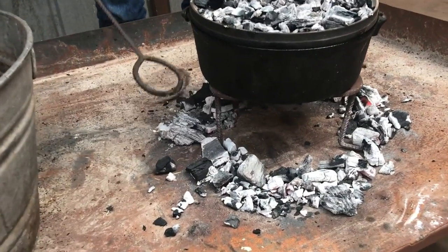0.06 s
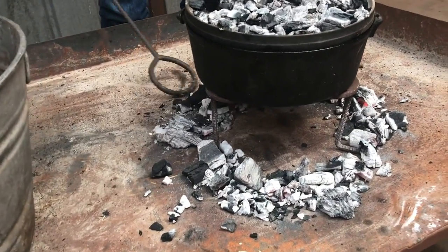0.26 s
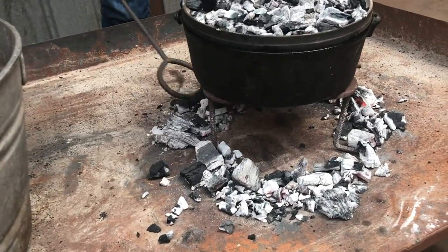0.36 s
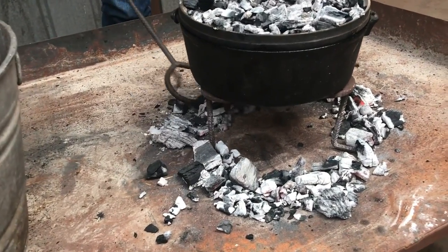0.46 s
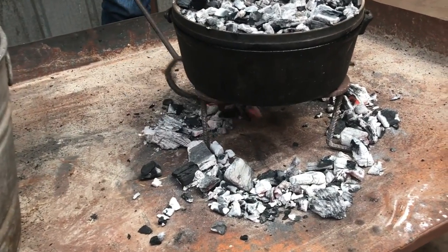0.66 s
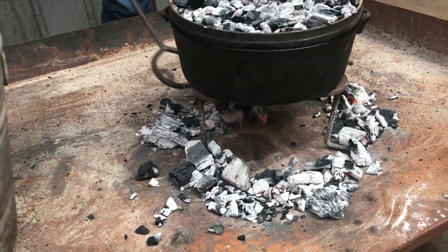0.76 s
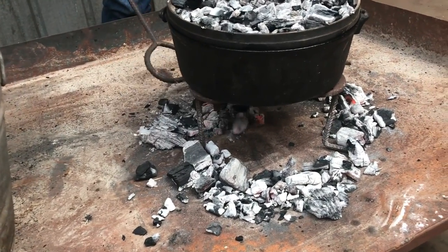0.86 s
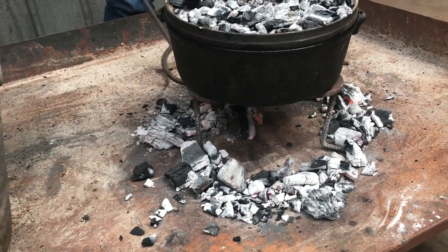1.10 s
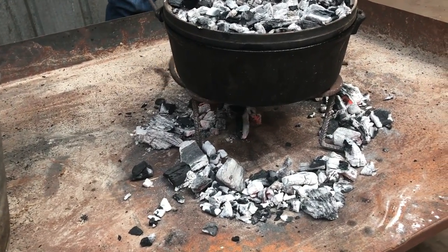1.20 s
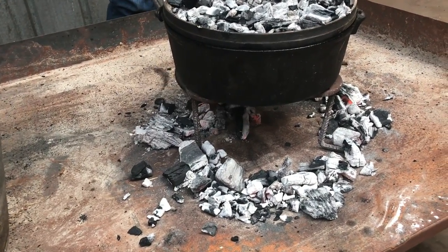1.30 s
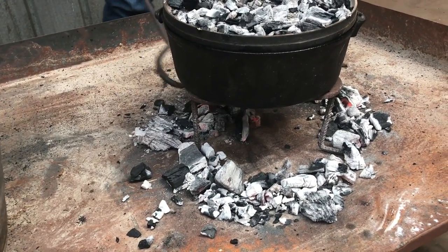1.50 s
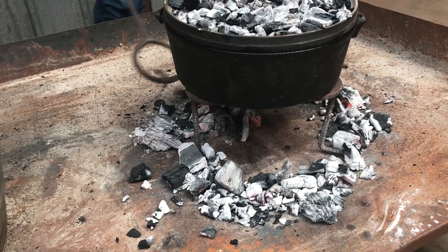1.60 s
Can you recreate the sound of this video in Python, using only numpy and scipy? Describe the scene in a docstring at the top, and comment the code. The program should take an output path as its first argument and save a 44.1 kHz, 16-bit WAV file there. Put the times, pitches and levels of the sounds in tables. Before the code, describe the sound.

Metal poker knocks a steel table, then drags brittle coals in two rough, ringing scrapes

```python
"""In a barn, a metal poker knocks on a sheet-steel table and twice drags hard coals across it.
Knocks and tiny slips make the sheet boom in its modes, and some modes briefly sing.
Dense random grains hiss under the coals, small edges scratch, loose lumps clack and chips tick.
Random echo taps smear the treble, over a quiet hush of filtered noise."""
import sys
import numpy as np
from scipy import signal
from scipy.fft import rfft, irfft, next_fast_len
from scipy.io import wavfile
from scipy.ndimage import uniform_filter1d

SR = 44100
rng = np.random.default_rng(int(sys.argv[2]) if len(sys.argv) > 2 else 0)


def file_out(sig):
    """Save sig as 16-bit WAV at sys.argv[1]."""
    # one column per channel
    cols = np.atleast_2d(sig).T
    # limit, then scale
    lim = np.clip(cols, -1, 1)
    pcm = np.round(lim * 32767).astype(np.int16)
    wavfile.write(sys.argv[1], SR, pcm)


def convert_level_to_amplitude(level_db):
    """Map a level in decibels to its linear amplitude factor."""
    exponent = np.asarray(level_db, float) / 20
    return 10 ** exponent


N = 72765  # length in samples

# Strong modes of the sheet:
# (frequency [Hz], level [dB], time to fall 60 dB [s], half waves along the poker's path)
SHEET_MODES = [(133.86, -1, 0.66, 0.17), (204.9, -2, 0.34, 0.18), (252.6, -2.5, 0.23, 1.66),
               (336.8, -5, 0.095, 0.61), (379, -5.5, 0.21, 0.87), (474, -7, 0.62, 0.68),
               (621, -24.5, 0.093, 5.3), (756, -4.5, 0.46, 1.12), (784.7, -6, 0.26, 2.69),
               (843, -7, 0.11, 1.92), (880, -5.5, 0.3, 0.98), (994, -17.5, 0.63, 0.67),
               (1060, -13, 0.12, 1.2), (1544, -20.5, 0.065, 1.84), (2120, -20, 0.28, 1.53)]
# Coals dragged over the sheet: (time [s], force on the sheet [dB], hardness [dB per octave],
# place on the path [0-1], grit level [dB])
DRAG_PATH = [(0, -50.5, 8.5, 0.4, -49.5), (0.098, -94.5, -29, 0.2, -65.5), (0.198, -63, 0, 0.76, -73.5),
             (0.342, -47, 4, 0, -61), (0.372, -31, -3.5, 0.08, -43), (0.391, -29, 8, 0.28, -36.5),
             (0.429, -33, -3.5, 0.15, -42.5), (0.457, -34, 7.5, 0.73, -40), (0.5, -32.5, 7, 0.6, -41.5),
             (0.562, -38, 1, 0.74, -48.5), (0.662, -50.5, 4.5, 0.56, -61.5), (0.798, -50, -3.5, 0.14, -58),
             (0.947, -49, 3.5, 0.45, -60.5), (1.048, -93, -13.5, 0.6, -72), (1.16, -53, 4, 1, -53.5),
             (1.208, -54.5, 1, 0, -54), (1.236, -53, -14, 0.4, -45.5), (1.255, -32.5, -1.5, 0.19, -44),
             (1.292, -39, -0.5, 0.57, -40.5), (1.35, -43, 2.5, 0, -46), (1.431, -52.5, 4, 0.68, -55),
             (1.521, -50.5, -3.7, 0.21, -67), (1.65, -66, 6.5, 0.2, -61.5)]
# Relative tone colour of the grit: (frequency [Hz], level [dB])
GRIT_COLOUR = [(500, -77), (1500, -9.5), (2500, -11), (3600, -13.5), (4700, -11.5), (6100, -12.5),
               (8600, -5), (11300, -7), (13000, -13.5), (15800, -24.5)]
SLIP_SPREAD_DB = 4.5  # how much stronger the rare big slips are


def evened(x):
    """Scales a sound to an rms of one."""
    return x / np.sqrt(np.mean(x ** 2) + 1e-20)


def read(points, hz):
    """Reads a table between its points, with frequency on a log scale."""
    f, value = np.transpose(points)
    return np.interp(np.log(hz + 1), np.log(f + 1), value)


def coloured(x, gain):
    """Filters the last axis by gain(hz)."""
    size = next_fast_len(x.shape[-1] + 4096)
    spectrum = rfft(x, size) * gain(np.fft.rfftfreq(size, 1 / SR))
    return irfft(spectrum, size)[..., :x.shape[-1]]


def clicks(per_s, spread_db, shape):
    """Makes random clicks of either sign, a few of them large."""
    chance = rng.random(shape)
    strength = rng.exponential(1, shape)
    sign = rng.choice([-1., 1.], shape)
    return evened((chance < per_s / SR) * sign * convert_level_to_amplitude(spread_db * np.minimum(strength, 5)))


def drag_track(column, t):
    """Follows one column of the drag table through time."""
    rows = np.array(DRAG_PATH)
    return np.interp(t, rows[:, 0], rows[:, column])


def lumps():
    """Uneven pressure: contact comes in clumps of about 10 ms."""
    slow = uniform_filter1d(uniform_filter1d(rng.standard_normal(N), 400), 400)
    return convert_level_to_amplitude(3.5 * evened(slow))  # rms swing in dB


def ring(hz, t60, sign):
    """Rings a group of modes after one tap: fading sines, with unit energy in all."""
    t = np.arange(24000) / SR
    sines = sign[:, None] * np.sin(2 * np.pi * hz[:, None] * t)
    h = sines.sum(0) * convert_level_to_amplitude(-60 * t / max(t60, .03))
    return h / np.linalg.norm(h)


def mode_groups(t):
    """Lists each strong mode alone, then the crowd in half-octave groups with wandering weights."""
    # How long the weak modes ring: (frequency [Hz], time to fall 60 dB [s])
    crowd_t60 = [(60, 1), (400, 0.45), (1500, 0.43), (5000, 0.55)]
    groups = []
    for k, (f, db, t60, waves) in enumerate(SHEET_MODES):
        groups.append((np.array([f]), db, t60, waves, [(-1.) ** np.array([k])], [1]))
    hz = np.arange(40, 5000, 7.) + 7 * rng.random(709)
    size = rng.standard_normal((2, 709))
    band = np.round(2 * np.log2(hz))
    wander = 2 * np.pi * 2.3 * t  # 2.3 turns a second
    for b in np.unique(band):
        f = hz[band == b]
        shares = [np.cos(wander + b), np.sin(wander + b)]
        groups.append((f, 0, read(crowd_t60, f.mean()), 0, size[:, band == b], shares))
    return groups


def add_knocks(drive, chatter, k, waves, octave):
    """Adds the poker's blows to one mode group's drive: a first contact, then fading chatter."""
    # Poker blows: (time [s], force [dB], hardness [dB per octave], place on the path [0-1],
    # chatter fade time to 1/e [s])
    knocks = [(0.231, -24.5, 1.77, 0.45, 0.023), (0.86, -38.5, 1.5, 0.47, 0.014),
              (1.0719, -33.5, -1.5, 0.22, 0.063), (1.223, -45, 7, 0.4, 0.046)]
    after = np.arange(8000) / SR
    for s, force_db, tilt_db, spot, chatter_s in knocks:
        at = round(s * SR)
        blow = chatter[at + k:at + k + 8000] * np.exp(-after / max(chatter_s, .002))
        blow[0] = 22.6  # first contact, against chatter of about one
        reach = np.cos(np.pi * waves * spot)  # the mode's shape under the poker
        drive[at:at + 8000] += blow * convert_level_to_amplitude(force_db + tilt_db * octave) * reach


def add_thumps(drive, hz):
    """Adds weight landing on the sheet to the drive of one strong mode, one sample per landing."""
    # Weight landing: (time [s], level at the lowest mode [dB], softness [dB per octave])
    thumps = [(0.2313, 7, -9), (1.0727, 5, -10), (1.144, 1, -9)]
    for s, force_db, tilt_db in thumps:
        drive[round(s * SR)] += convert_level_to_amplitude(force_db + tilt_db * np.log2(hz / SHEET_MODES[0][0]))


def sheet():
    """Blows and slips drive each mode by contact hardness and by its shape at the contact."""
    # Tone colour of the weaker modes between the strong ones: (frequency [Hz], level [dB])
    crowd_colour = [(45, -22), (70, -15.5), (100, -9.5), (160, -3.5), (330, -2), (520, -4.5), (900, -5.5),
                    (1400, -14), (2200, -16), (3200, -32), (5000, -58)]
    slips_per_s = 1800
    t = np.arange(N) / SR
    force, hard, place = (drag_track(column, t[::64]) for column in (1, 2, 3))
    slips, chatter = clicks(slips_per_s, SLIP_SPREAD_DB, (2, N)) * lumps()
    strong, crowd = np.zeros((2, N))
    for k, (f, db, t60, waves, signs, shares) in enumerate(mode_groups(t)):
        is_strong = k < len(SHEET_MODES)
        octave = np.log2(max(f.mean(), 130) / 400)
        push = convert_level_to_amplitude(force + hard * octave) * np.cos(np.pi * waves * place)
        drive = np.roll(slips, 37 * k) * np.repeat(push, 64)[:N]  # each group gets shifted slips
        add_knocks(drive, chatter, k, waves, octave)
        if is_strong:
            add_thumps(drive, f[0])
        part = strong if is_strong else crowd
        for sign, share in zip(signs, shares):
            part += convert_level_to_amplitude(db) * signal.fftconvolve(drive * share, ring(f, t60, sign))[:N]
    return strong + coloured(crowd, lambda hz: convert_level_to_amplitude(read(crowd_colour, hz)))


def grit():
    """Dense brittle grains under the drag, and a crack with a shower of chips for each clack."""
    # Lumps that clack: (time [s], level [dB], brightness [dB per octave], time to fall 60 dB [s])
    clacks = [(0.2318, -32.5, -6, 0.17), (0.359, -41, -3, 0.36), (0.386, -44, -6, 0.35),
              (0.7636, -42.5, 1, 0.11), (0.8645, -39.5, 0.5, 0.064), (1.074, -45, 0, 0.43)]
    grains_per_s, grain_spread_db = 4000, 2
    t = np.arange(N) / SR
    grains = clicks(grains_per_s, grain_spread_db, (2, N))
    out = evened(coloured(grains, lambda hz: convert_level_to_amplitude(read(GRIT_COLOUR, hz))))
    out *= lumps() * convert_level_to_amplitude(drag_track(4, t))
    chips = clicks(grains_per_s, grain_spread_db, (len(clacks), 2, 16384))
    for (s, db, tilt_db, t60), shower in zip(clacks, chips):
        shower = evened(coloured(shower, lambda hz: convert_level_to_amplitude(
            read(GRIT_COLOUR, hz) + tilt_db * np.log2(hz / 8000 + 0.0033))))
        part = out[:, round(s * SR):][:, :16384]
        after = t[:part.shape[1]]
        rise = np.minimum(after / 0.0016, 1)  # 1.6 ms
        part += shower[:, :len(after)] * convert_level_to_amplitude(db - 60 * after / max(t60, .01)) * rise
    # the right side is half like the left
    return np.array([out[0], .5 * out[0] + np.sqrt(.75) * out[1]])


def scratches():
    """Sparse brittle edges catching under the drag, each a short ring at its own pitch."""
    per_s, level_db, fade_cycles = 300, -6, 4  # level is relative to the grit track
    t, out = np.arange(512) / SR, np.zeros(N)
    pitches = np.geomspace(1400, 10000, num=30)
    trains = clicks(per_s / len(pitches), SLIP_SPREAD_DB / 2, (len(pitches), N))
    for hz, train in zip(pitches, trains):
        edge = np.sin(2 * np.pi * hz * t) * np.exp(-t * hz / fade_cycles)
        edge /= np.linalg.norm(edge)
        out += convert_level_to_amplitude(read(GRIT_COLOUR, hz)) * signal.oaconvolve(train, edge)[:N]
    return evened(out) * convert_level_to_amplitude(level_db + drag_track(4, np.arange(N) / SR))


def air():
    """Quiet broad hush of the barn: noise, more alike on both sides at some pitches than others."""
    # Relative tone colour of the hush: (frequency [Hz], level [dB])
    hush_colour = [(20, 6), (55, 12.5), (140, 18.5), (500, 10.5), (1100, -1.5), (2500, -7.5), (6000, -22),
                   (11000, -27), (13500, -42)]
    # How alike left and right are: (frequency [Hz], likeness [0-1])
    likeness = [(50, 0.84), (800, 1), (3000, 0.44), (10000, 0.18)]
    a, b = rng.standard_normal((2, N))

    def same(hz):
        return np.clip(read(likeness, hz), 0, 1)

    right = coloured(a, same) + coloured(b, lambda hz: np.sqrt(1 - same(hz) ** 2))
    pair = np.array([a, right])
    return convert_level_to_amplitude(-48) * evened(coloured(pair, lambda hz: convert_level_to_amplitude(read(hush_colour, hz))))


def barn(x):
    """Echoes as sparse taps of random sign, each frequency band dying at its own speed."""
    # How long the echo lasts: (frequency [Hz], time to fall 60 dB [s])
    echo_t60 = [(100, 1), (1000, 0.52), (4000, 0.41), (12000, 0.1)]
    taps = np.zeros((2, SR))
    at = np.arange(200, SR - 20, 20)
    spots = at + rng.integers(0, 20, (2, len(at)))
    np.put_along_axis(taps, spots, rng.choice([-1., 1.], (2, len(at))), 1)
    hz, t, z = signal.stft(taps, SR, nperseg=256)
    fade = convert_level_to_amplitude(-60 * t / np.maximum(read(echo_t60, hz), .05)[:, None])
    tail = signal.istft(z * fade, SR, nperseg=256)[1]
    return signal.fftconvolve(x[None], tail / np.linalg.norm(tail[0]), axes=1)[:, :N]


def ticks():
    """Single chips tick: a short broad snap of noise and a fuzzy ring of narrow noise."""
    # Ticks of chips: (time [s], level [dB], ring frequency [Hz], time to fall 60 dB [s])
    chip_ticks = [(.101, -51, 13000, .018), (.654, -50, 12000, .016), (1.192, -52, 7600, .05),
                  (1.338, -45, 2130, .06), (1.435, -50, 2180, .05), (1.456, -46, 3720, .035),
                  (1.457, -51, 14900, .03), (1.606, -58, 6500, .025)]
    snap_db, snap_s, width_hz = 1, .003, 260  # snap over ring, snap fade to 1/e, ring half width
    out, t = np.zeros(N + 4096), np.arange(4096) / SR
    noises = rng.standard_normal((len(chip_ticks), 2, 4096))
    for (s, db, f, t60), (a, b) in zip(chip_ticks, noises):
        snap = evened(coloured(a, lambda hz: hz / (hz + 4000) / (1 + (hz / f / 2) ** 2)))
        snap *= convert_level_to_amplitude(snap_db) * np.exp(-t / snap_s)
        tone = evened(coloured(b, lambda hz: 1 / (1 + ((hz - f) / width_hz) ** 2)))
        tone *= convert_level_to_amplitude(-60 * t / max(t60, .01))
        out[round(s * SR):][:4096] += convert_level_to_amplitude(db) * (snap + tone)
    return out[:N]


def singing():
    """Stick-slip locks onto a mode: it swells, holds, then dies at the nearest strong mode's rate."""
    # Singing modes: (start [s], level before the throb [dB], frequency [Hz], start of decay after onset [s])
    sings = [(.232, -25, 792, 0.016), (.382, -23, 250, 0.054), (.382, -25.5, 204, 0.031),
             (0.388, -21.5, 835, 0.06), (0.231, -32.5, 204, 0.011), (1.244, -24, 133, 0.078),
             (.231, -28, 482, 0.015), (.232, -34, 1680, 0.012), (0.42, -37.5, 950, 0.13),
             (0.41, -36, 1500, 0.082)]
    rise_s, waver_hz = 0.013, 6.4  # waver is the rms pitch drift
    judder_hz, judder_depth = 46, .8  # the contact hops; modes above 400 Hz throb with it
    out, t = np.zeros(N + SR), np.arange(SR // 2) / SR
    modes = np.array(SHEET_MODES)
    noises = rng.standard_normal((len(sings), 2, len(t)))
    for (s, db, hz, hold_s), (a, b) in zip(sings, noises):
        nearest = np.argmin(abs(modes[:, 0] - hz))
        t60 = max(modes[nearest, 2], .05)
        turns = np.cumsum(hz + waver_hz * evened(uniform_filter1d(a, 1500))) / SR
        shape = np.minimum(t / rise_s, 1) * convert_level_to_amplitude(db - 60 * np.maximum(t - hold_s, 0) / t60)
        shape *= 1 + judder_depth * (hz > 400) * np.cos(2 * np.pi * judder_hz * t)
        out[round(s * SR):][:len(t)] += shape * np.sin(2 * np.pi * (turns + b[0]))  # random phase
    return out[:N]


def scene():
    """Adds up the table, the coals, their echo in the barn, and the hush."""
    steel = sheet() + singing()
    coal = grit() + scratches()
    chips = ticks()
    highs = coloured(steel, lambda hz: hz ** 2 / (hz ** 2 + 1300 ** 2))
    sent = convert_level_to_amplitude(-12) * highs + convert_level_to_amplitude(-0.5) * coal[0] + convert_level_to_amplitude(-6) * chips  # what the barn echoes
    return steel + coal + chips + barn(sent) + air()


def roll_off(x):
    """The treble ends steeply here."""
    return signal.sosfilt(signal.butter(12, 15920, fs=SR, output="sos"), x)


def record(dry):
    """A close microphone pair: the left is louder in the mids and slightly late."""
    # Lean to the left: (frequency [Hz], left over right [dB])
    lean = [(60, 1), (1000, 3.5), (3000, 2), (8000, 1), (14000, -2)]
    left_lag_s, edge_hz = 6e-5, 15900  # nothing passes from the edge up
    side = np.array([[.5], [-.5]])  # left and right share each difference equally

    def pair_gain(hz):
        lag = np.exp(-2j * np.pi * hz * side * left_lag_s)
        return (hz < edge_hz) * convert_level_to_amplitude(side * read(lean, hz)) * lag

    return roll_off(coloured(dry, pair_gain))


dry = scene()
out = record(dry)
file_out(out)
```